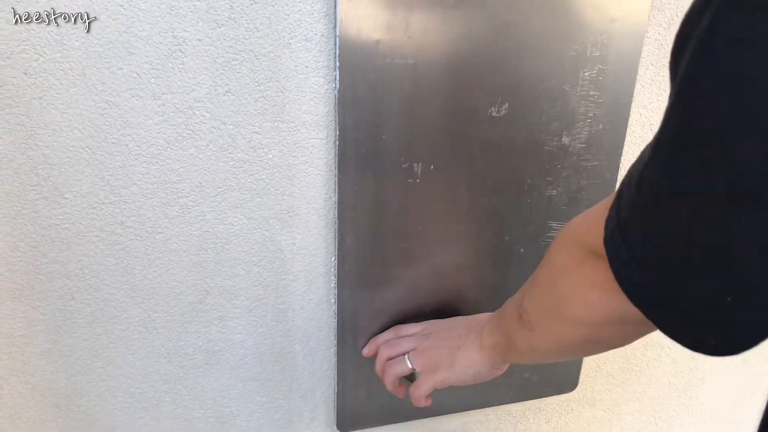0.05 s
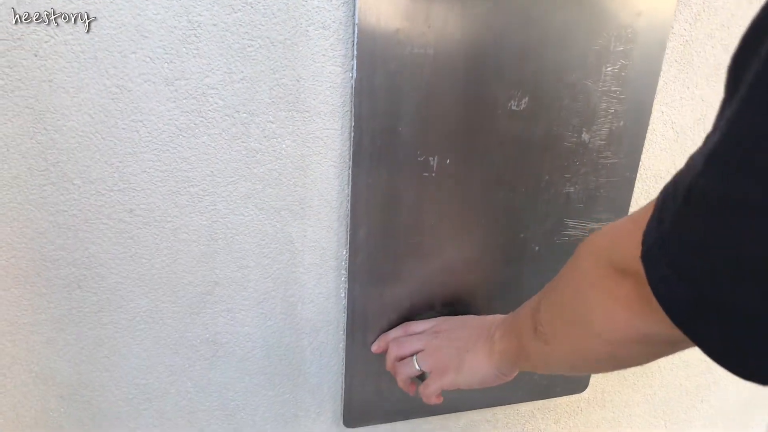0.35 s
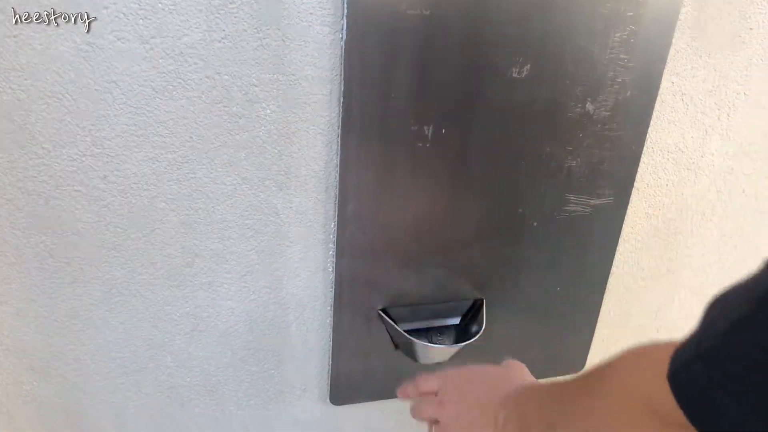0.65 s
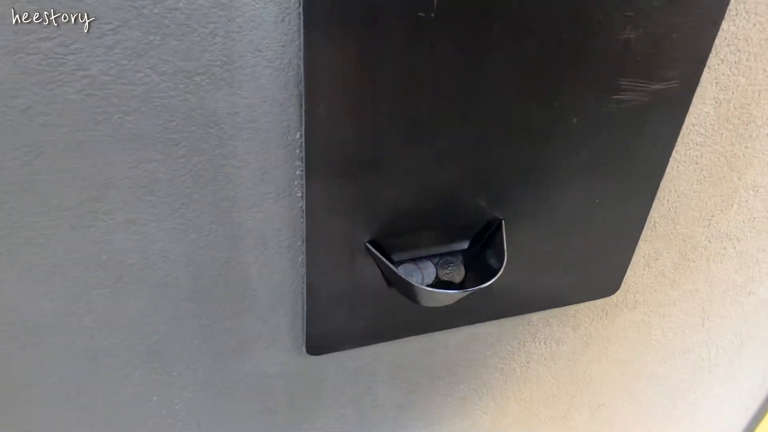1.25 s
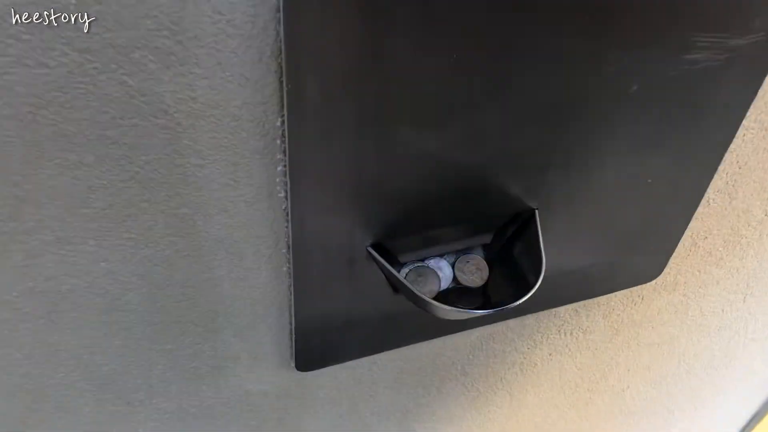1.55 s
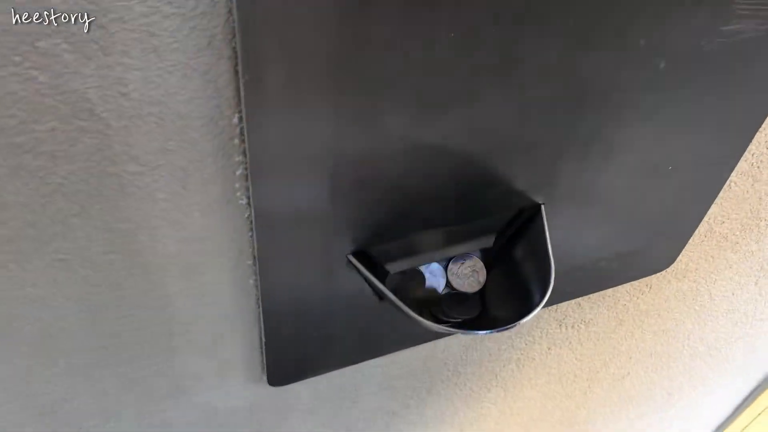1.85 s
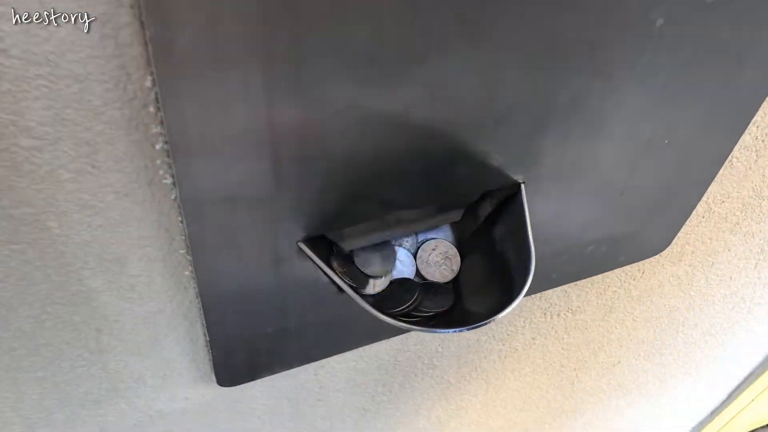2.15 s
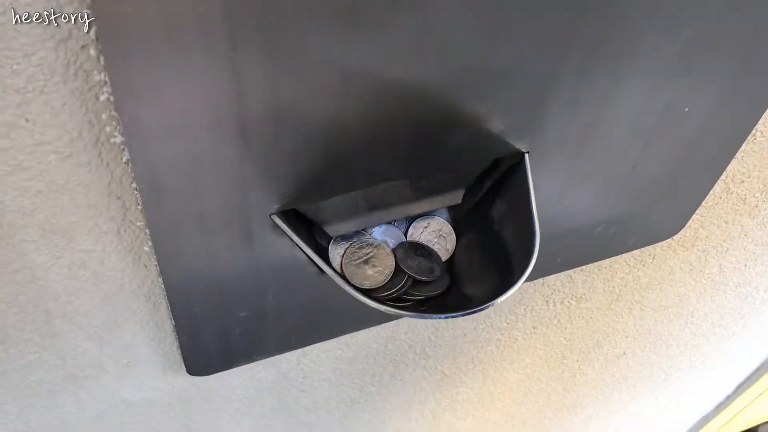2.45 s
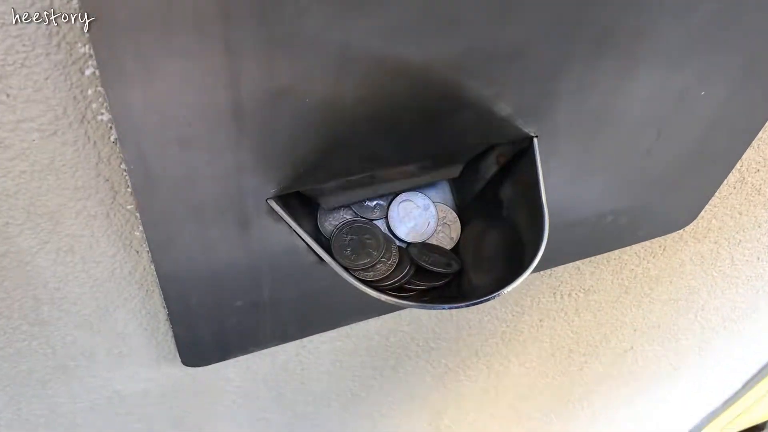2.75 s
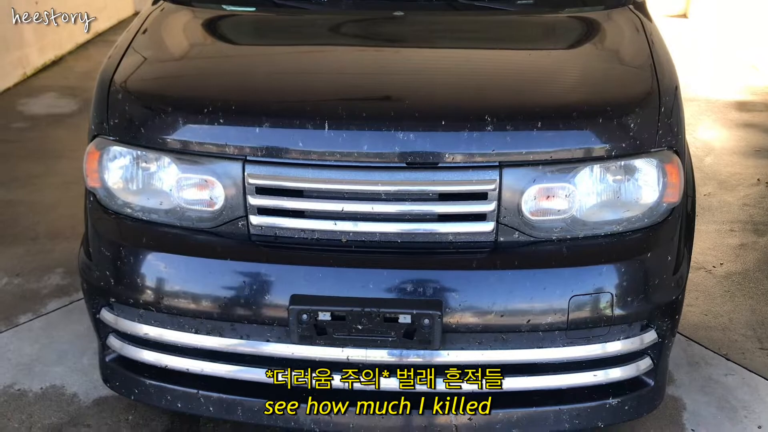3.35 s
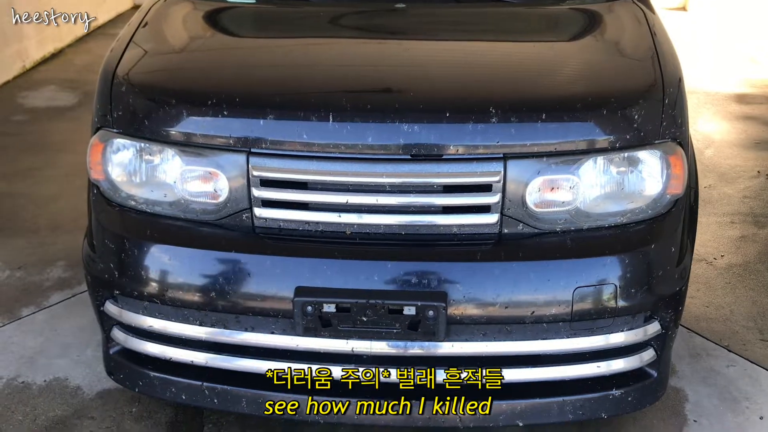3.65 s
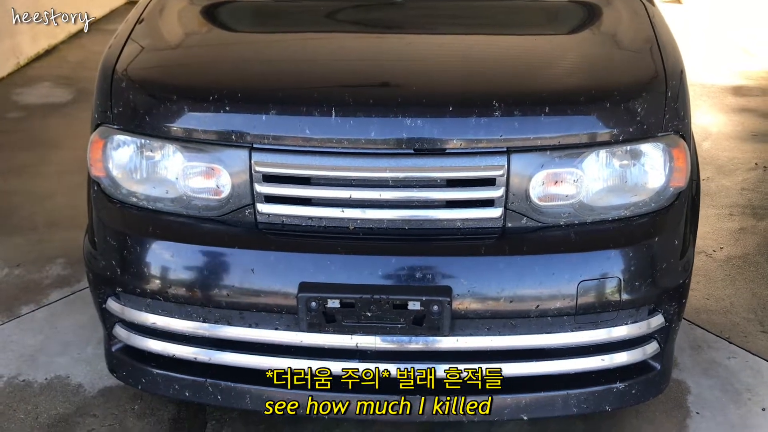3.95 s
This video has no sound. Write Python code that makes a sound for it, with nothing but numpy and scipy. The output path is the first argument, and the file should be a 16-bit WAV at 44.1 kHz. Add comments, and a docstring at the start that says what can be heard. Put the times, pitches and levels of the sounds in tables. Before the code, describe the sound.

Coins clatter rapidly into a change machine's metal cup, then cut to quiet outdoor air.

```python
"""At a change machine: the cabinet hums and the hopper motor whines while coins knock down the chute.
Each coin drops into a steel cup, clashes on the pile, rings and rebounds; sliding coins rattle.
At 2.9 s the scene changes to quiet outdoor air with distant traffic and one faint, squeaky scuff."""
import sys
import numpy as np
from scipy import signal
from scipy.fft import rfft, irfft, next_fast_len
from scipy.io import wavfile
from scipy.ndimage import map_coordinates

SR = 44100
rng = np.random.default_rng(int(sys.argv[2]) if len(sys.argv) > 2 else 0)


def log_audio(samples):
    """Write samples as a 16-bit WAV file to the path given in sys.argv[1]."""
    # one column per channel
    frames = np.atleast_2d(samples).T
    # limit to full scale, then quantise
    limited = np.clip(frames, -1, 1)
    pcm = np.round(limited * 32767).astype(np.int16)
    wavfile.write(sys.argv[1], SR, pcm)


N = 176400
T = np.arange(N) / SR
AGE = np.arange(SR // 3) / SR  # s since a contact
MACHINE_END_S, OUTDOORS_START_S = 2.889, 2.933

# steel cup modes: f/Hz, level/dB, t60/s
CUP_MODES = [(2847, -8, .13), (2990, -14, 0.26), (3600, -34, 0.083), (3970, -12.5, .08), (4620, -8, 0.091),
             (5630, -4, 0.057), (6596, -3, 0.079), (7100, -7.5, 0.055), (8660, -10.5, 0.071),
             (10880, -13, 0.053), (11430, -3.5, .1), (11700, -10, 0.093), (12800, -6, 0.083),
             (14230, -8.5, .1), (14780, -6, .1)]
# coin-on-coin spectrum: f/Hz, level/dB
CLASH_SPECTRUM = [(100, -27.5), (500, -16), (900, -4.5), (1400, -7), (2000, -5), (2350, -12.5),
                  (2800, -0.5), (3600, -1), (4500, -2), (6000, 0.5), (7100, -1.5), (8200, -6), (9300, 0.5),
                  (12000, -5.5), (13800, -2), (15300, 6), (16000, 0.5)]


def amp(db):
    """Decibels to gain."""
    return 10 ** (np.asarray(db) / 20)


def unit(x):
    """Scale to rms 1."""
    return x / np.sqrt(np.mean(x ** 2) + 1e-20)


def curves(rows):
    """Per-sample curve for each column after t/s."""
    times_s, *columns = np.transpose(rows)
    return [np.interp(T, times_s, column) for column in columns]


def wobble(knots_per_s):
    """Smooth random curve."""
    return map_coordinates(rng.standard_normal(4096), [T * knots_per_s], mode="wrap")


def add(track, t_s, sound):
    """Mix a sound in at t_s."""
    i = int(np.clip(round(t_s * SR), 0, N - 1))
    track[i:i + len(sound)] += sound[:N - i]


def colour(x, spectrum):
    """Minimum-phase filter of unit power through (f/Hz, level/dB) points."""
    size = 2 * next_fast_len(N // 2 + 8192)
    hz, db = np.transpose(spectrum)
    bins_hz = np.fft.rfftfreq(size, 1 / SR)
    gain = unit(amp(np.interp(np.log(bins_hz + 1), np.log(hz), db)))
    cepstrum = irfft(np.log(gain + 1e-6))
    cepstrum[1:size // 2] *= 2
    cepstrum[size // 2 + 1:] = 0
    return irfft(rfft(x, size) * np.exp(rfft(cepstrum)), size)[:N]


def noise(spectrum):
    """Coloured noise of rms 1."""
    return unit(colour(rng.standard_normal(N), spectrum))


def tone(hz, wander_hz, knots_per_s):
    """Sine of rms 1 with wandering pitch."""
    return np.sqrt(2) * np.sin(2 * np.pi * np.cumsum(hz + wander_hz * wobble(knots_per_s)) / SR)


def rise(tau_s):
    """Exponential attack."""
    return 1 - np.exp(-AGE / tau_s)


def fade(t60_s):
    """Exponential decay."""
    return np.exp(-np.log(1000) * AGE / t60_s)


def swell(centre_s, width_s):
    """Bell-shaped envelope."""
    return np.exp(-((T - centre_s) / width_s) ** 2)


def ring(hz, t60_s):
    """One struck mode, random phase."""
    return np.sin(2 * np.pi * (hz * AGE + rng.random())) * fade(t60_s)


def burst(t60_s):
    """Dense modes dying together, as decaying noise."""
    return rng.standard_normal(len(AGE)) * fade(t60_s)


def cabinet():
    """The running machine hums, rumbles and hisses; its panels sing."""
    # hum tones: f/Hz, level/dB
    hum_tones = [(74, -43.5), (107.5, -42.5), (161, -55)]
    # panel tones, changing as the listener nears the cup: f/Hz, start level/dB, end level/dB
    panel_tones = [(277.8, -51.5, -72), (906, -52.5, -51.5), (1197, -47, -64), (1285, -62, -48)]
    # cabinet noise: f/Hz, level/dB
    rumble_spectrum = [(15, -39.5), (25, -12.5), (105, -2), (225, -20), (387, -19), (582, -27.5),
                       (795, -11), (1110, -19), (1220, -15), (1400, -21.5), (1630, -16), (2140, -25),
                       (2600, -22), (3380, -55), (5720, -120)]
    # cabinet envelope: t/s, bass level/dB, mid level/dB
    band_levels = [(0.0, -39, -41), (0.04, -45.5, -42), (0.45, -42, -45.5), (0.69, -43.5, -44.5),
                   (1.89, -42.5, -42), (2.44, -41, -42), (2.7, -45, -41), (2.88, -35.5, -39)]
    # mechanism hiss: f/Hz, level/dB
    hiss_spectrum = [(1500, -24), (2300, -16), (2900, -3), (4000, -1), (5300, -1), (7000, -10),
                     (10000, -11.5), (15500, -17.5)]
    crossover_hz, span_s = 384, [0, MACHINE_END_S]
    bass_db, mid_db = curves(band_levels)
    hum = sum(amp(db + .97 * wobble(31)) * tone(hz, wander_hz=3.6, knots_per_s=20)
              for hz, db in hum_tones)
    panels = np.zeros(N)
    for hz, start_db, end_db in panel_tones:
        panel_db = np.interp(T, span_s, [start_db, end_db]) - 4.5 + 5.2 * wobble(20)
        panels += amp(panel_db) * tone(hz, wander_hz=8.53, knots_per_s=50)
    crossover = [signal.butter(3, crossover_hz, kind, fs=SR, output="sos") for kind in ("low", "high")]
    bass, mid = [unit(signal.sosfilt(sos, noise(rumble_spectrum))) for sos in crossover]
    hiss = amp(np.interp(T, span_s, [-54, -49.5])) * noise(hiss_spectrum)  # grows as the listener nears
    return amp(bass_db + 39.5) * hum + panels + amp(bass_db - 1.5) * bass + amp(mid_db - 3) * mid + hiss


def motor():
    """The hopper motor whines unsteadily under load."""
    # whine envelope: t/s, level/dB
    whine_levels = [(0.0, -62), (1.0, -55.5), (1.35, -47), (1.76, -43), (2.71, -44), (2.79, -64),
                    (2.85, -38.5), (2.88, -45.5)]
    # whine partials: harmonic number, level/dB
    harmonics = [(1, -17.5), (2, -2.5), (3, -9.5), (4, -5), (5, -10)]
    whine_hz, drift, flutter = 399.5, .00338, .0043
    whine_db, = curves(whine_levels)
    cycles = np.cumsum(whine_hz * (1 + drift * wobble(8) + flutter * wobble(70))) / SR
    return sum(amp(whine_db + db + 2.6 * wobble(24.93)) * np.sqrt(2) * np.sin(2 * np.pi * k * cycles)
               for k, db in harmonics)


def pile_clash(t60_s=.042, partials=80):
    """One contact excites the pile's many partials, different each time."""
    spread_db, noise_db = 13, -2.5
    hz = rng.uniform(1000, 16000, partials)
    gains = amp(rng.uniform(-spread_db, spread_db, partials))
    lines = np.zeros(len(AGE) // 2 + 1, complex)
    lines[(hz * len(AGE) / SR).astype(int)] = gains * np.exp(2j * np.pi * rng.random(partials))
    cloud = unit(irfft(lines, len(AGE))) + amp(noise_db) * rng.standard_normal(len(AGE))
    return unit(cloud) * fade(t60_s) * rise(.00057)


def jostle():
    """Tiny contacts of sliding coins tick, ring high and keep the cup singing."""
    # sliding coins: t/s, rattle level/dB, top ring level/dB
    jostle_levels = [(0.0, -21.5, -22), (0.18, -36.5, -52), (0.31, -27.5, -35), (0.38, -38.5, -28),
                     (0.43, -26.5, -30), (0.63, -33, -33), (0.74, -57, -73), (0.86, -23.5, -50),
                     (0.93, -50, -57), (1.0, -28.5, -39), (1.25, -28, -20), (1.32, -44, -40),
                     (1.38, -32, -26), (1.52, -29.5, -36), (1.6, -53.5, -30.5), (1.72, -41, -21.5),
                     (1.8, -24.5, -41), (1.89, -52, -97), (1.99, -30, -55), (2.14, -38.5, -29.5),
                     (2.27, -25.5, -42), (2.41, -35.5, -38.5), (2.53, -25, -22), (2.59, -32.5, -28.5),
                     (2.7, -36.5, -59.5), (2.73, -37.5, -60), (2.85, -63, -104), (2.88, -40.5, -91)]
    # drive of the cup's two lowest modes: t/s, level/dB
    cup_levels = [(0, -3.5), (.7, -3.5), (1.2, -13.5), (2.7, -3)]
    contacts, contacts_per_s = 780, 260
    top_hz, scatter_hz, cup_q = 15100, 396, 39
    ticks, rings = np.zeros(N), np.zeros(N)
    for t_s in (np.arange(contacts) + rng.random(contacts)) / contacts_per_s:
        tick_db, top_db = rng.uniform(-9, 9), rng.uniform(-5.5, 5.5)
        add(ticks, t_s, amp(tick_db) * pile_clash(t60_s=.051, partials=20))
        hz = top_hz + scatter_hz * (rng.random() - rng.random())
        add(rings, t_s, amp(top_db) * rise(.001) * ring(hz, t60_s=.1))
    rattle_db, ring_db = curves(jostle_levels)
    cup_db, = curves(cup_levels)
    cup = sum(signal.lfilter(*signal.iirpeak(hz, cup_q, fs=SR), ticks) for hz, _, _ in CUP_MODES[:2])
    rattle = unit(colour(ticks, CLASH_SPECTRUM)) + amp(cup_db) * unit(cup)
    return amp(rattle_db - 10) * rattle + amp(ring_db - 6) * unit(rings)


def cup_ring():
    """The struck cup's modes, scattered in level and pitch."""
    return sum(amp(db + rng.uniform(-3.5, 5)) * ring(hz * (1 + .0052 * rng.normal()), t60_s)
               for hz, db, t60_s in CUP_MODES)


def coin_ring(low_db, mid_db, top_db, top_hz):
    """A coin's three bending modes; coins differ slightly in pitch."""
    tuning = 1 + .0041 * rng.normal()
    low_hz = 4160 * (1 + rng.uniform(-.012, .012))  # shifts with how the coin lies
    low = ring(low_hz, t60_s=.12)
    mid_hz = 9340 * tuning
    mid = ring(mid_hz, t60_s=.22)
    mid += .5 * ring(mid_hz * (1 + .013 * rng.normal()), t60_s=.22)  # embossing splits the mode: beats
    top = ring(min(top_hz, 15560) * tuning, t60_s=.16) * rise(.0015)  # builds as the coin chatters
    return amp(low_db) * low + amp(mid_db - 5.5) * mid + amp(top_db) * top


def clinks():
    """Each coin cracks on the steel, clashes on the pile, rings cup and itself, rebounds and settles."""
    # coins hitting the cup: t/s, clash level/dB, low, mid and top mode level/dB, top mode f/Hz
    strikes = [(0.0054, -20, -40, -46, -30, 15400), (0.018, -16, -45, -47, -25, 15400),
               (0.0508, -11, -28, -23, -22, 15700), (0.0717, -10, -70, -42, -24, 15400),
               (0.2147, -12.5, -42.5, -50, -30.5, 15200), (0.2227, -13.5, -33, -50, -38.5, 15300),
               (0.2497, -7, -51, -58, -23, 15200), (0.292, -15, -40, -31, -30, 15300),
               (0.389, -15.5, -30.5, -45, -27, 15350), (0.4013, -21, -30, -29, -52, 15300),
               (0.4229, -12.5, -39, -54, -35, 15300), (0.463, -20.5, -55, -40, -21, 15300),
               (0.5534, -20, -44, -30, -26.5, 15300), (0.574, -9, -30, -72, -38, 15300),
               (0.6016, -3.5, -51, -40, -49, 15400), (0.759, -4.5, -30, -25, -30, 15000),
               (0.798, -7.5, -27, -26, -22.5, 14400), (0.843, -12, -35, -40, -34, 14500),
               (0.9464, -13, -38, -48, -35, 15100), (0.969, -10.5, -33, -20, -16, 14800),
               (1.012, -16, -31.5, -33, -16, 15340), (1.0427, -22, -41.5, -32, -17.5, 15460),
               (1.1034, -23.5, -37, -34, -35.5, 14800), (1.1344, -12.5, -35, -38, -23, 15000),
               (1.149, -10, -25, -23, -34, 15300), (1.178, -9.5, -47, -32, -18, 15300),
               (1.194, -10.5, -51.5, -26, -15, 15300), (1.264, -24, -53, -33.5, -22, 15600),
               (1.334, -9.5, -15, -34, -38, 14900), (1.3477, -11.5, -30.5, -41, -27.5, 15600),
               (1.3676, -15, -30, -28, -23, 15500), (1.4544, -22, -54, -26, -15.5, 15200),
               (1.4676, -26, -56.5, -23.5, -22.5, 15500), (1.506, -7, -27.5, -44, -27, 14900),
               (1.5348, -9, -28.5, -34, -45.5, 15400), (1.5638, -4.5, -41, -28, -11, 15270),
               (1.666, -5.5, -25.5, -47, -41, 15000), (1.6826, -13, -31, -25.5, -13, 15800),
               (1.707, -10, -64, -45, -31, 15200), (1.752, -19.5, -39, -32, -18, 15500),
               (1.7864, -32, -46, -43, -28, 15600), (1.8715, -5, -20.5, -49, -13, 15000),
               (1.8927, -9.5, -27, -27.5, -20.5, 15360), (1.944, -13.5, -56.5, -31, -15.5, 15200),
               (2.0114, -25, -64, -54, -21, 15800), (2.0633, -3.5, -46, -23, -11, 15700),
               (2.076, -6.5, -33, -33, -30.5, 15300), (2.163, -16, -40, -24, -14.5, 15530),
               (2.2431, -10, -21, -46, -15, 15300), (2.2719, -11, -31, -66, -25.5, 15600),
               (2.294, -11.5, -67, -43, -31.5, 15100), (2.3013, -7.5, -30, -27, -17, 15000),
               (2.352, -15.5, -51, -39.5, -24.5, 15300), (2.4357, -9, -24, -47, -32.5, 14900),
               (2.4579, -4, -28.5, -37, -13.5, 15100), (2.4716, -10.5, -28.5, -23, -32.5, 15200),
               (2.5262, -14, -48.5, -42.5, -24, 15600), (2.562, -20.5, -49, -33, -18, 15200),
               (2.585, -12, -48, -45, -22.5, 15800), (2.6149, -5, -47, -38, -17.5, 15000),
               (2.642, -16.5, -29, -43, -17.5, 15100), (2.6777, -21.5, -50, -36, -28, 15300),
               (2.7021, -14.5, -37, -41, -22, 15200)]
    # coins tipping over, too damped to ring: t/s, level/dB
    taps = [(0.095, -31), (0.132, -17.5), (0.2013, -23), (0.2548, -6), (0.351, -15.5), (0.447, -10.5),
            (0.508, -38), (0.532, -27), (0.627, -29), (0.6553, -9.5), (0.789, -11), (0.808, -1.5),
            (0.937, -21), (0.979, -5.5), (1.026, -39), (1.110, -22.5), (1.274, -18), (1.554, -16.5),
            (1.693, -7), (1.74, -10.5), (1.769, -17), (1.797, -32), (1.91, -13), (2.0325, -8.5),
            (2.192, -13.5), (2.365, -15), (2.431, -9.5), (2.517, -16), (2.638, -9), (2.693, -18),
            (2.7211, -13), (2.757, -22)]
    # hard first contact with the steel: f/Hz, level/dB
    crack_spectrum = [(300, -24.5), (1300, -2.5), (4500, -1), (9000, -6), (16000, -3)]
    slap_s, slap_db = .005, -5  # edge lands first, then the face slaps down
    flight_s, rebound_db, loss_db = .014, -9, 6
    crack, clash, rings = np.zeros(N), np.zeros(N), np.zeros(N)
    for t_s, db, low_db, mid_db, top_db, top_hz in strikes:
        add(crack, t_s, amp(db) * burst(t60_s=.0059))
        add(clash, t_s, amp(db) * (pile_clash() + amp(-18.5) * pile_clash(t60_s=.17)))
        add(clash, t_s + slap_s * rng.uniform(.5, 1.5), amp(db + slap_db) * pile_clash())
        for k, delay_s in enumerate(np.cumsum(flight_s * rng.uniform(.5, 1.5, 3))):
            bounce_db = db + rebound_db - loss_db * k + rng.normal(0, 2.45)
            add(clash, t_s + delay_s, amp(bounce_db) * pile_clash())
        add(rings, t_s, amp(db - 20) * cup_ring() + coin_ring(low_db, mid_db, top_db, top_hz))
    for t_s, db in taps:
        add(clash, t_s, amp(db - 1) * pile_clash())
    chatter_db = 2.5 * wobble(700)
    return (amp(-13) * colour(crack, crack_spectrum)
            + amp(chatter_db - 12.5) * colour(clash, CLASH_SPECTRUM) + rings)


def pings():
    """Some strikes make one pitch of the cup or coin ring out briefly."""
    # bright pings: t/s, f/Hz, level/dB
    ping_rows = [(0.02, 1450, -29), (0.249, 6600, -15.5), (0.25, 2863, -15), (0.6, 2960, -19.5),
                 (1.041, 5650, -25.5), (1.334, 5670, -18), (1.536, 9410, -15), (1.756, 11500, -26),
                 (1.786, 15700, -6.5), (1.870, 5680, -25), (2.035, 3550, -22.5), (2.243, 14200, -14),
                 (2.529, 3090, -25), (2.586, 3500, -19.5), (2.6155, 6546, -11.5)]
    track = np.zeros(N)
    for t_s, hz, db in ping_rows:
        add(track, t_s, amp(db) * ring(hz, t60_s=.045))
    return track


def chute():
    """Coins knock dully inside the chute and ring two close modes; one knock is hollow."""
    # chute knocks: t/s, level/dB
    knocks = [(0.02, -29.5), (0.409, -31.5), (0.6082, -36.5), (0.626, -29.5), (0.6888, -32.5),
              (0.8115, -27.5), (0.869, -29), (0.9624, -25), (1.0538, -29.5), (1.1496, -21.5),
              (1.187, -26.5), (1.3188, -28.5), (1.3676, -31.5), (1.433, -34.5), (1.508, -25), (1.5258, -27),
              (1.5773, -28), (1.6164, -30.5), (1.668, -27), (1.7092, -24), (1.736, -28.5), (1.769, -25.5),
              (1.799, -29), (1.8688, -26), (1.8955, -26), (1.9613, -25), (2.0, -33.5), (2.0706, -21),
              (2.1356, -24), (2.169, -30), (2.2463, -26.5), (2.325, -24), (2.271, -25.5), (2.299, -27),
              (2.4336, -23.5), (2.4875, -26), (2.586, -30)]
    # chute body: f/Hz, level/dB
    body_spectrum = [(100, -60.5), (550, -11), (900, -15), (1350, 5), (1600, -0.5), (1880, 12.5),
                     (2150, -8.5), (3000, -17), (8000, -44.5)]
    mode_hz, mode_t60_s, body_t60_s = 1865, .065, .068
    hollow_s, hollow_hz = 2.036, 1390
    body, rings = np.zeros(N), np.zeros(N)
    attack = rise(.0027)
    for t_s, db in knocks:
        hz = mode_hz * (1 + .022 * rng.normal())
        add(body, t_s, amp(db - 1) * attack * burst(body_t60_s))
        pair = ring(hz, mode_t60_s) + .5 * ring(.97 * hz, mode_t60_s)
        add(rings, t_s, amp(db - 2.5) * attack * pair)
    add(rings, hollow_s, amp(-20) * attack * ring(hollow_hz, body_t60_s))
    return colour(body, body_spectrum) + rings


def outdoor_air():
    """Distant traffic as a near-steady low noise."""
    # air and traffic: f/Hz, level/dB
    air_spectrum = [(15, -44), (28, -24), (45, -6.5), (65, 2), (105, 4), (160, -0.5), (210, -3.5),
                    (280, -8), (450, -14.5), (700, -14), (1000, -11), (1400, -17), (2000, -26),
                    (3000, -32.5), (4500, -40), (6500, -45), (9000, -52), (16000, -51)]
    return amp(-45 + .23 * wobble(5.2)) * noise(air_spectrum)


def scuff():
    """One faint scuff ending in a thin squeak."""
    # scuff: f/Hz, level/dB
    scuff_spectrum = [(1500, -21.5), (3500, -7.5), (6000, -4), (9000, 0), (15000, -24)]
    # squeak: f/Hz, level/dB
    squeak_spectrum = [(2500, -40), (3400, -17), (3700, -2), (4000, -19), (5200, -51)]
    scrape = amp(-72) * swell(3.53, width_s=.022) * noise(scuff_spectrum)
    squeak = amp(-68) * swell(3.555, width_s=.035) * noise(squeak_spectrum)
    return scrape + squeak


def scene():
    """The machine, a short silence, then open air; mono."""
    machine = clinks() + pings() + jostle() + chute() + motor() + cabinet()
    outdoors = scuff() + outdoor_air()
    machine_gate = np.clip((MACHINE_END_S - T) / .0011, 0, 1)
    outdoors_gate = np.clip((T - OUTDOORS_START_S) / .0012, 0, 1)
    return (machine * machine_gate + outdoors * outdoors_gate)[None]


def record(dry):
    """Soft peak limit, then a steep low-pass."""
    peak_limit, cutoff_hz = .39, 15900
    soft = dry / (1 + (dry / peak_limit) ** 4) ** .25
    size = next_fast_len(N + SR // 2)
    lowpass = 1 / (1 + (np.fft.rfftfreq(size, 1 / SR) / cutoff_hz) ** 160)
    return irfft(rfft(soft, size) * lowpass, size)[:, :N]


dry = scene()
out = record(dry)
log_audio(out)
```